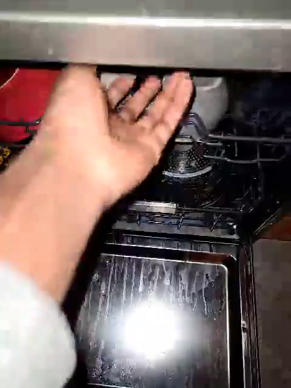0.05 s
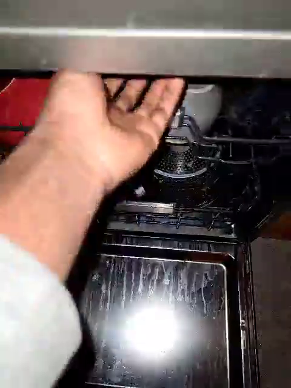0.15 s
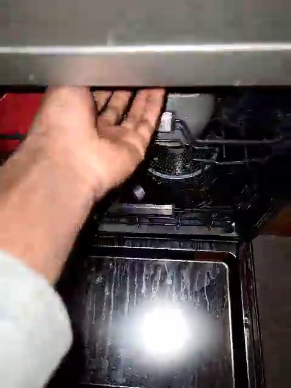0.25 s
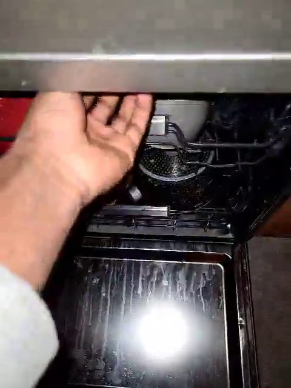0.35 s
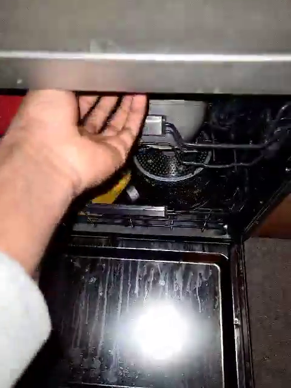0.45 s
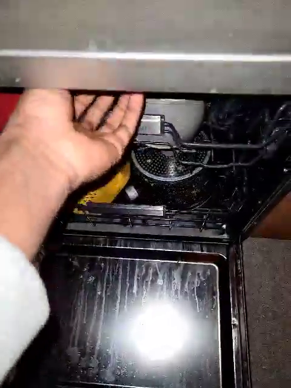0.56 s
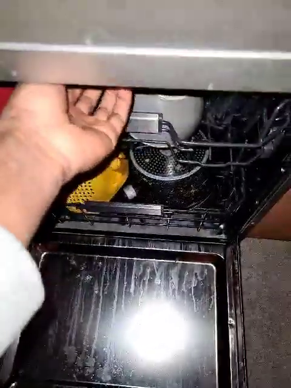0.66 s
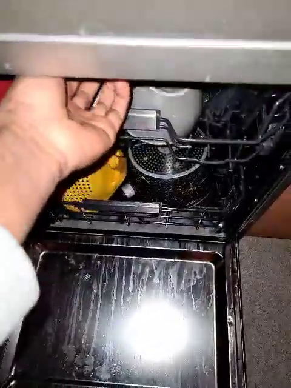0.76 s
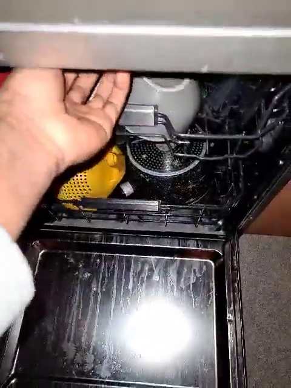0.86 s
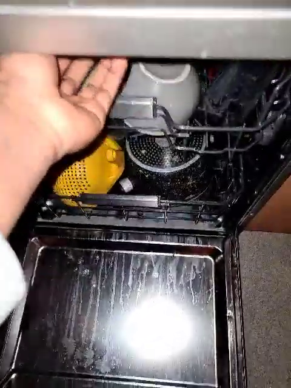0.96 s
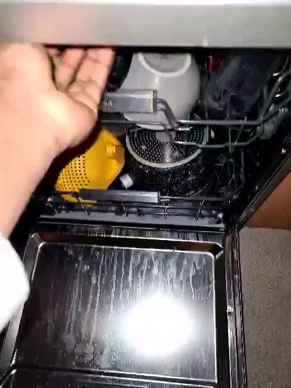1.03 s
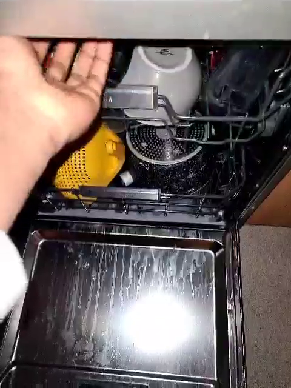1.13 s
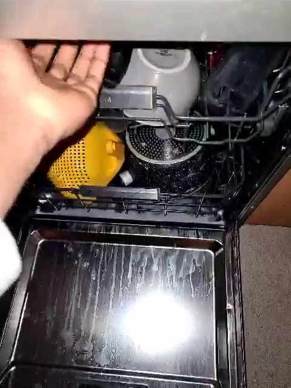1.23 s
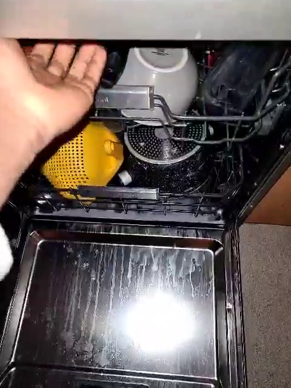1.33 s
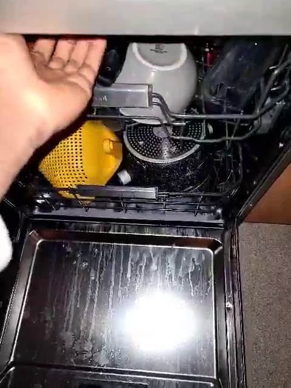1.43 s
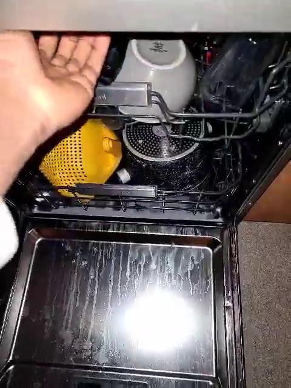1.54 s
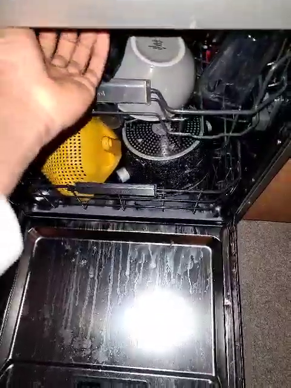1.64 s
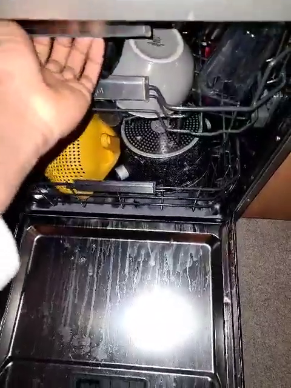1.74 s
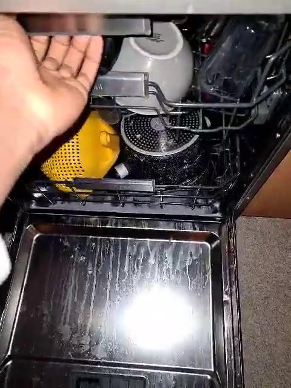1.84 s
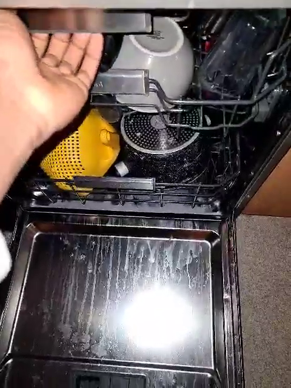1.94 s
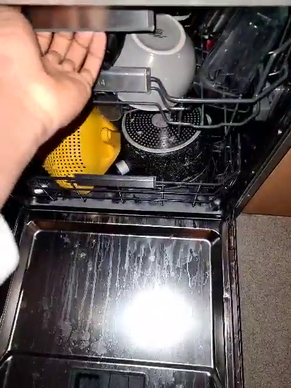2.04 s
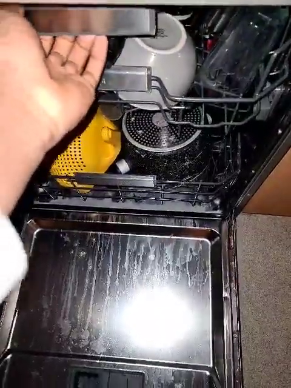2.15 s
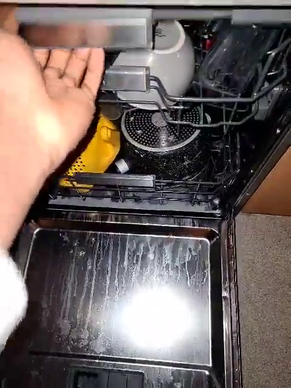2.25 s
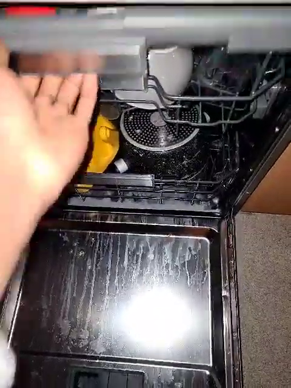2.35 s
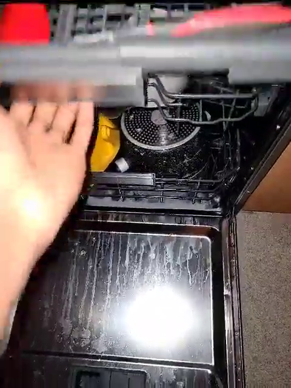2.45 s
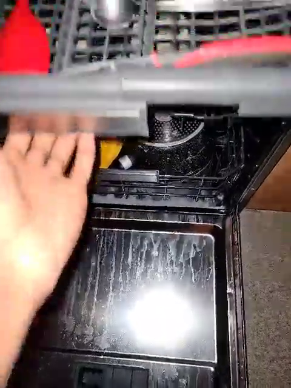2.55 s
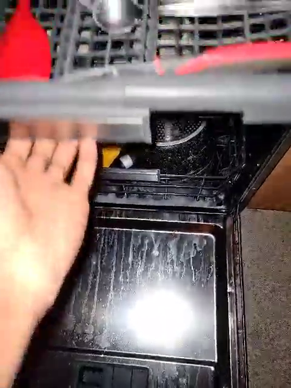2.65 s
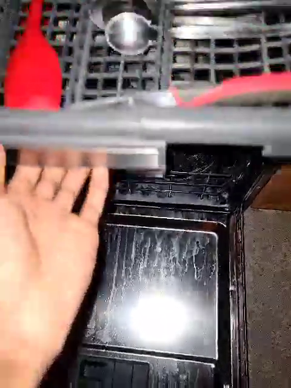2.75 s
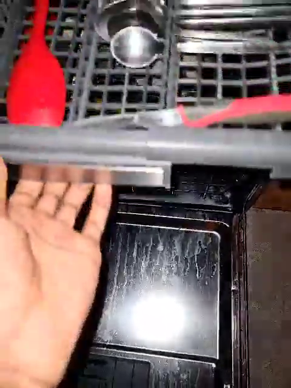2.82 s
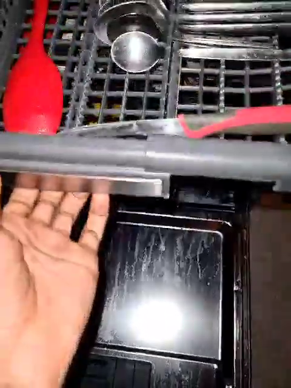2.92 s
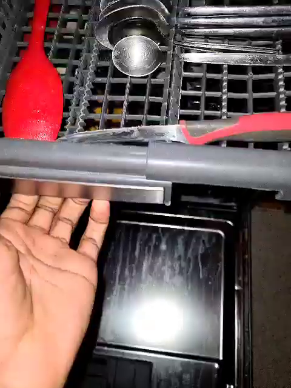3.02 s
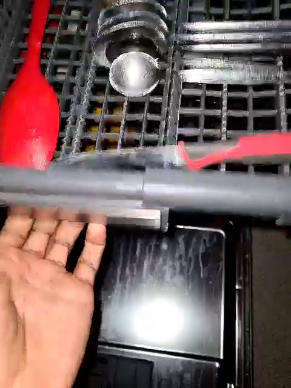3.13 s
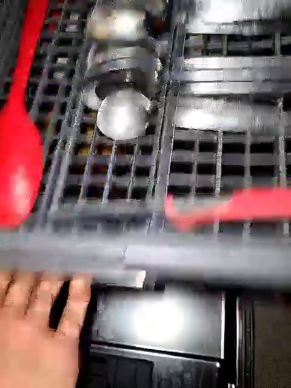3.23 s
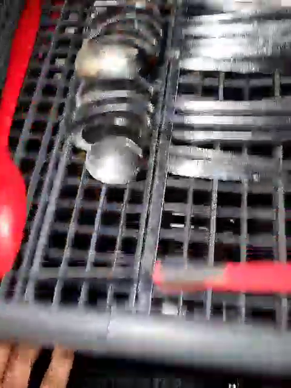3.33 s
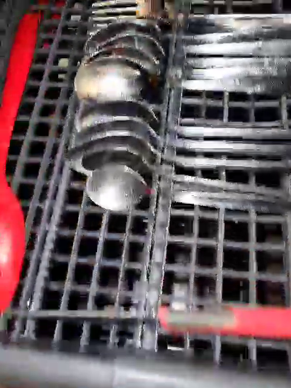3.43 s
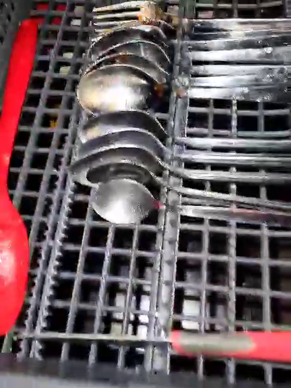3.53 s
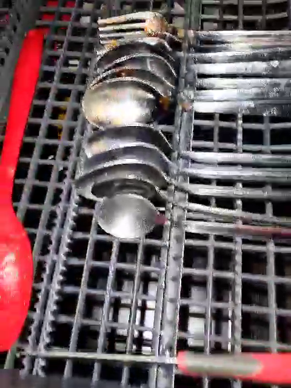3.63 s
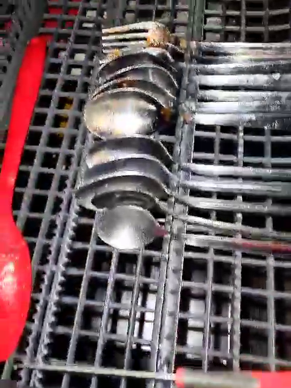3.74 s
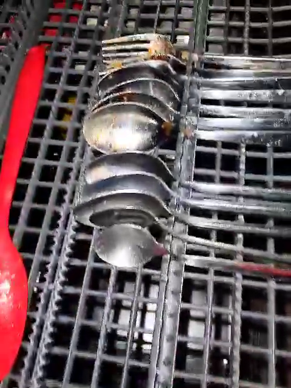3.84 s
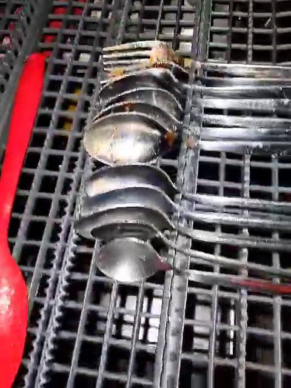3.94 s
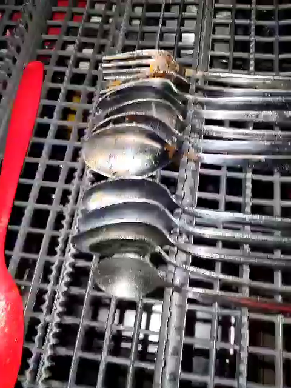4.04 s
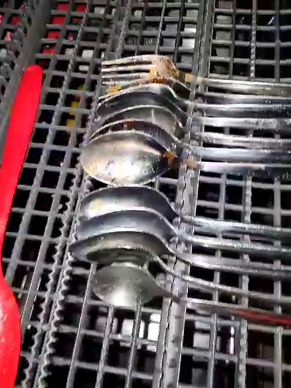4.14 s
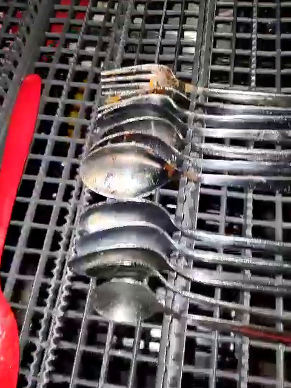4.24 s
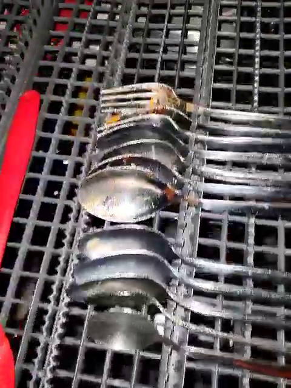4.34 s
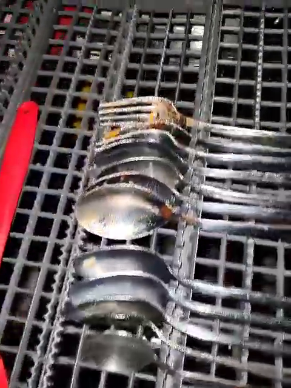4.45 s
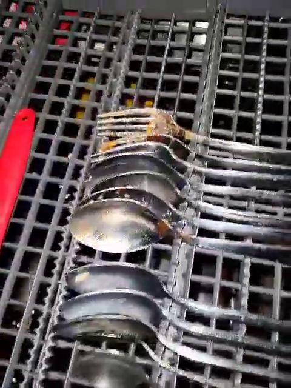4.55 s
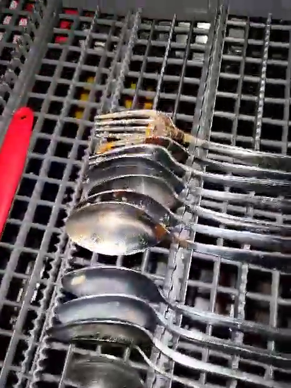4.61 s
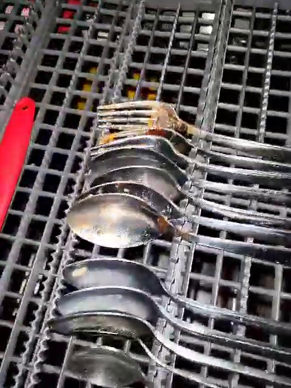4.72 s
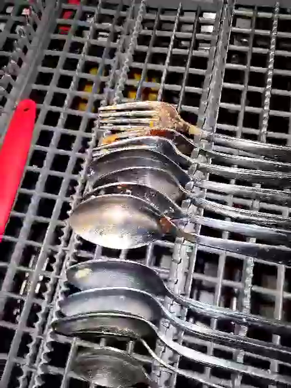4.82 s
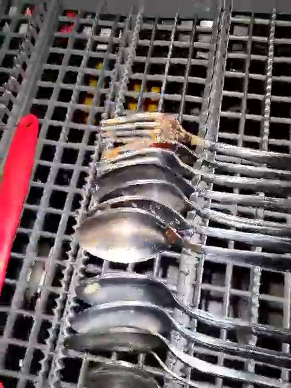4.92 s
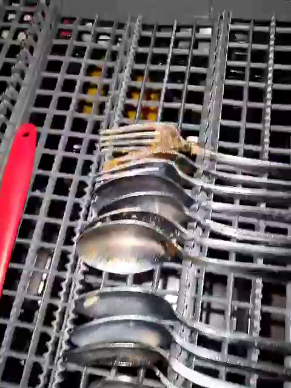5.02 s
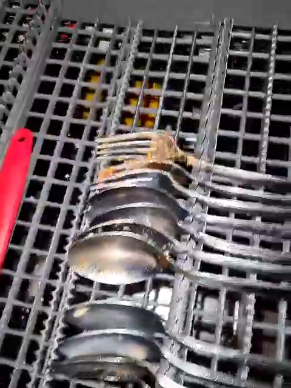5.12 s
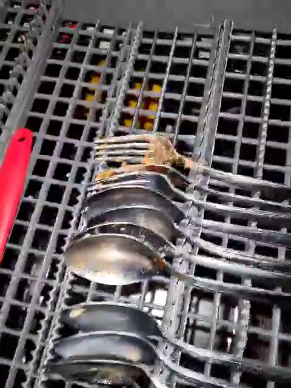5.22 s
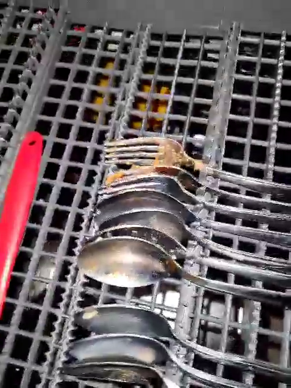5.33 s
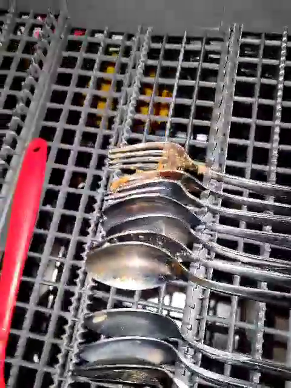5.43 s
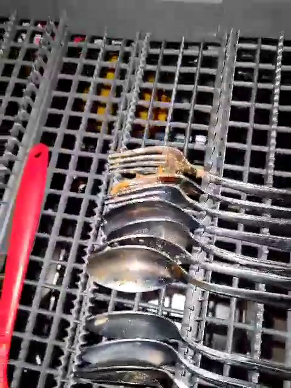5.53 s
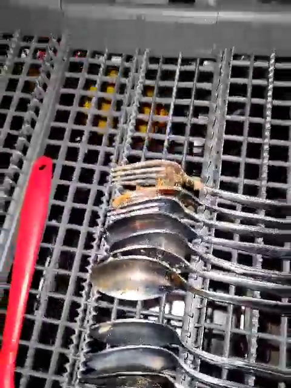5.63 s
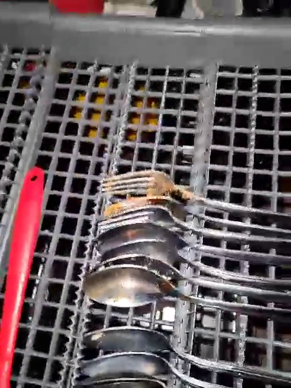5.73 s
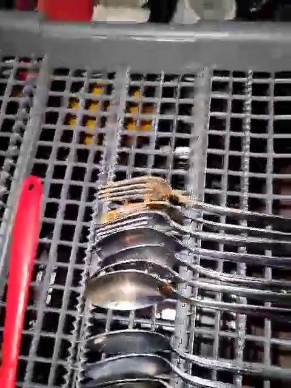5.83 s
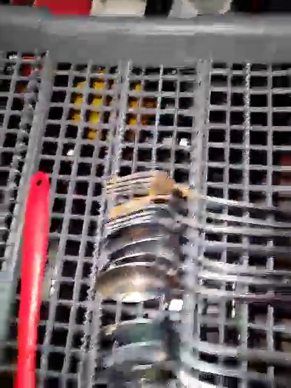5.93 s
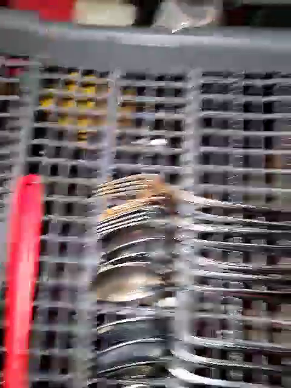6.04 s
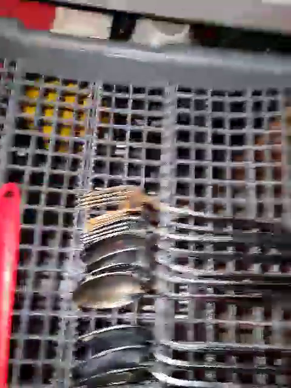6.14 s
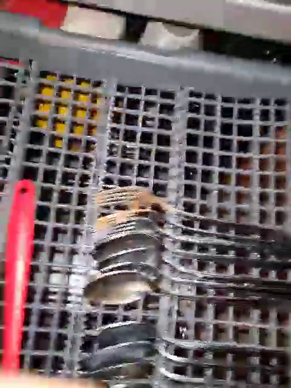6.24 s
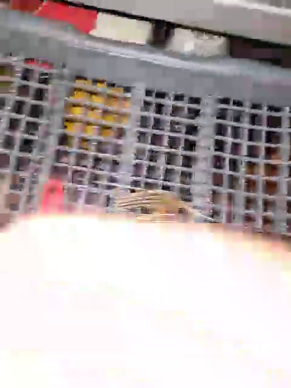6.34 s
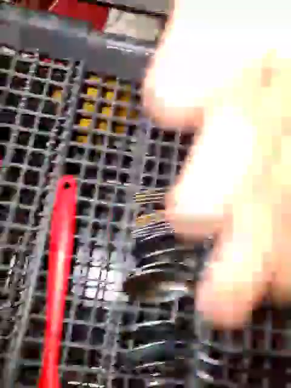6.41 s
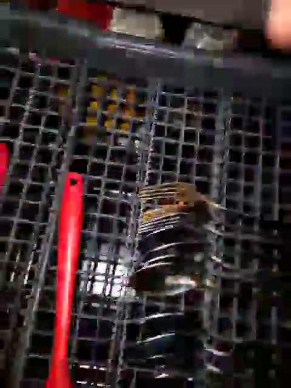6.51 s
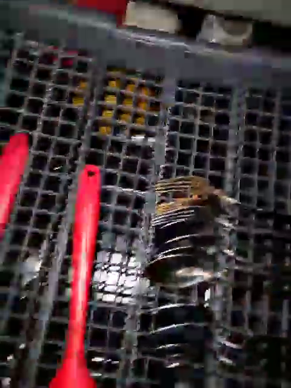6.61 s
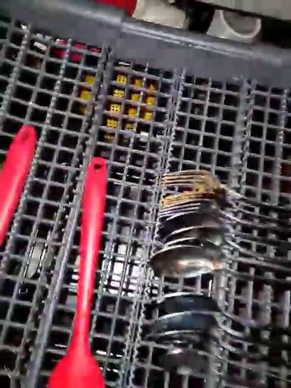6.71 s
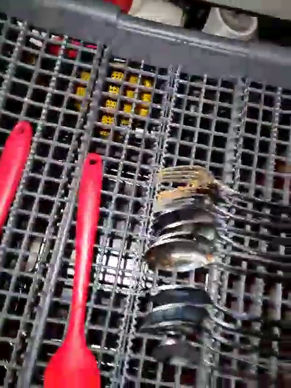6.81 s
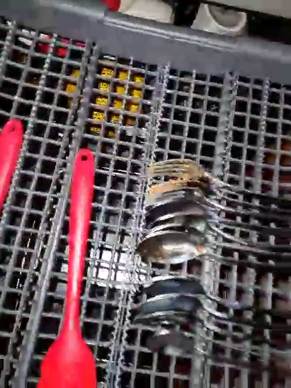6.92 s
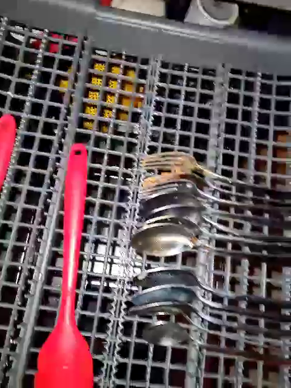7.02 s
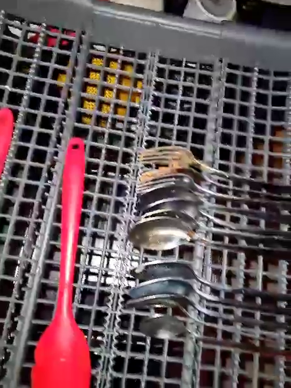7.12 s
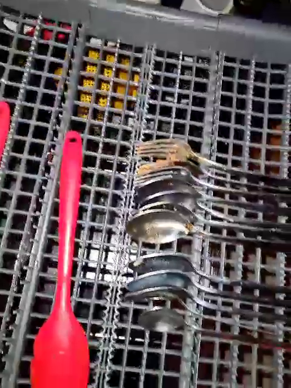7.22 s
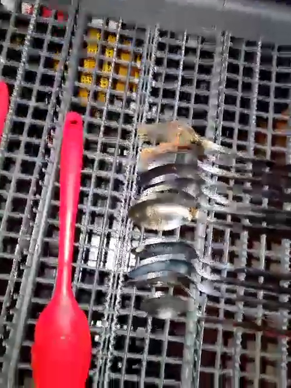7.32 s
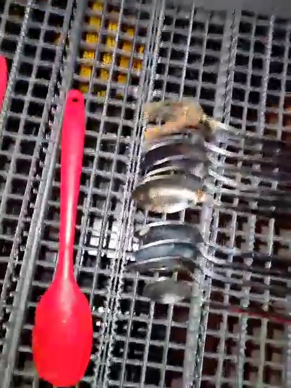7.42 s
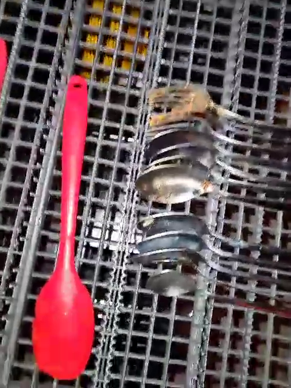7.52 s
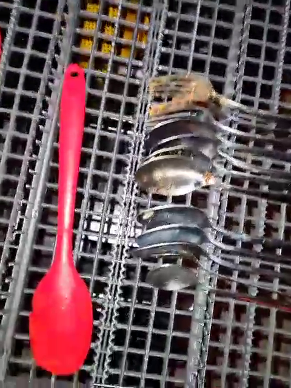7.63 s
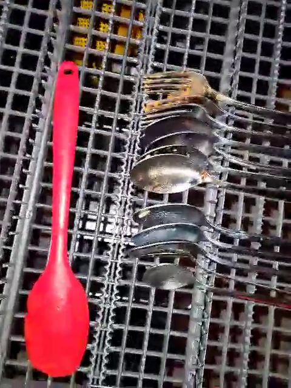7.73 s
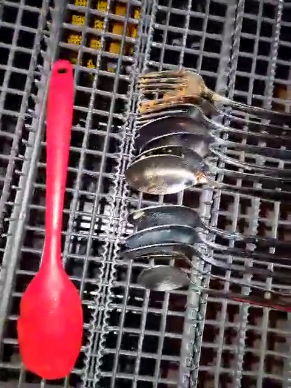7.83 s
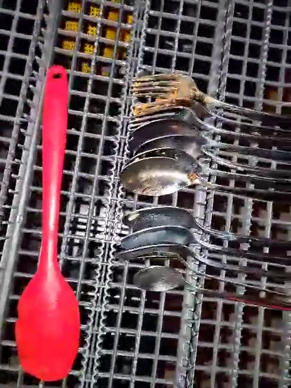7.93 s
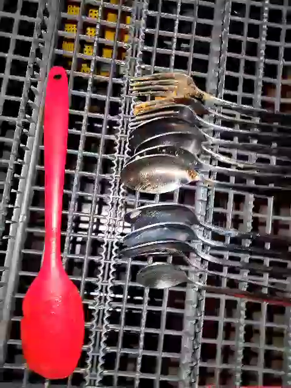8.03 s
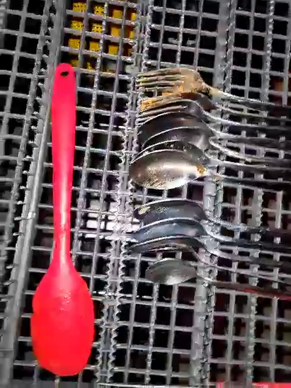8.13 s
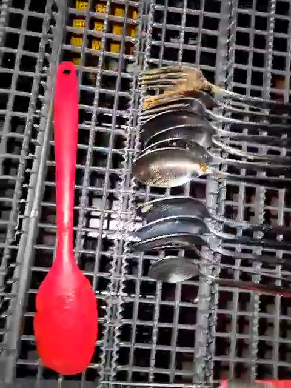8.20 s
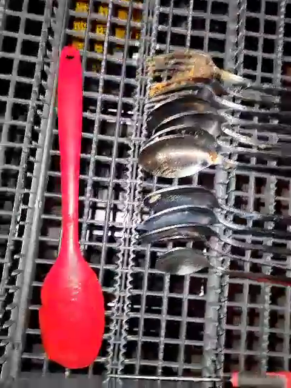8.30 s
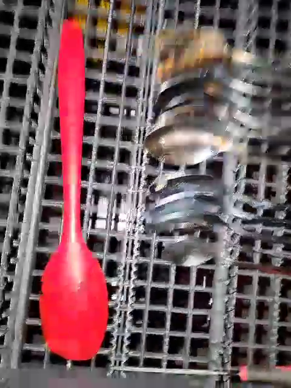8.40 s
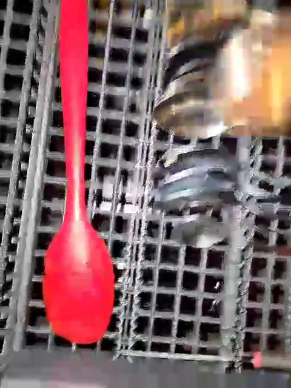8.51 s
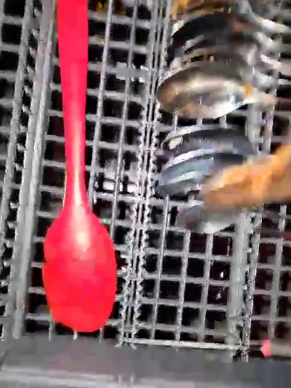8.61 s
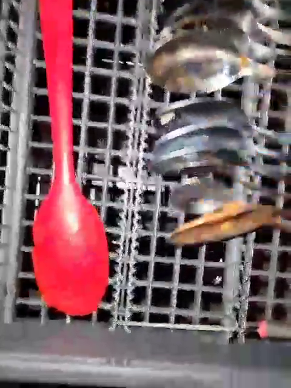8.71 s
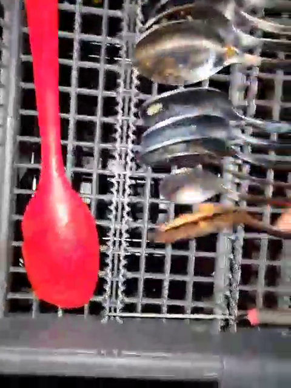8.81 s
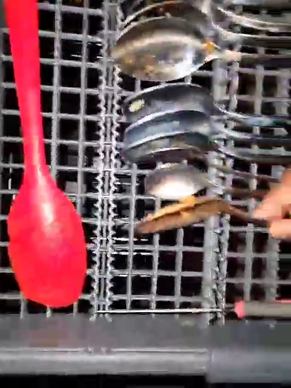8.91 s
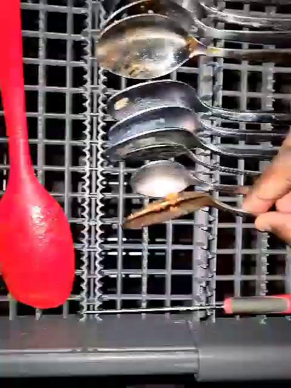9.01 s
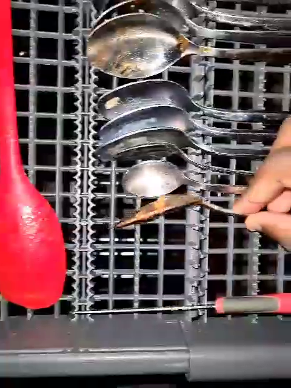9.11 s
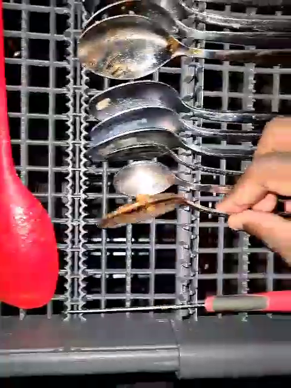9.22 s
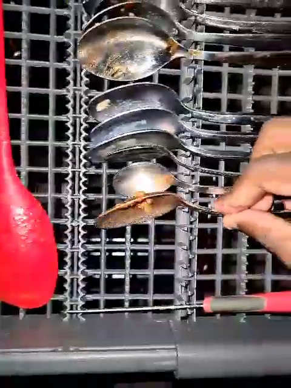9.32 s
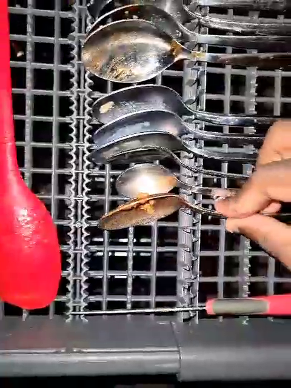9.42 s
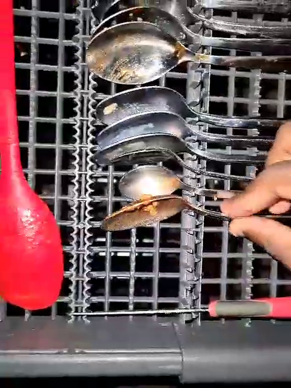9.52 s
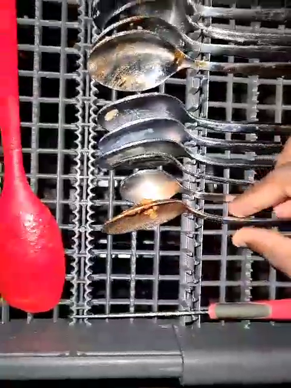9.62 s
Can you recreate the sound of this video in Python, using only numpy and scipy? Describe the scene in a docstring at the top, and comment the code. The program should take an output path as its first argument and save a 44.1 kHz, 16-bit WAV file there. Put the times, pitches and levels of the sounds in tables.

```python
"""A quiet kitchen, at an open dishwasher. A hand grips the cutlery tray and pulls it out: the rollers
grind, squeak and bump along the rails until the tray crashes into its stop and the cutlery jingles.
The tray is nudged once more, then fingers pick among the spoons with light clicks. Rolling and knocks
are showers of tiny contacts that set the steel tub ringing; spoons and a rack wire ring in their modes."""
import sys
import numpy as np
from scipy import signal
from scipy.fft import rfft, irfft
from scipy.io import wavfile

SR = 44100
rng = np.random.default_rng(int(sys.argv[2]) if len(sys.argv) > 2 else 0)


def to_wav(sig):
    """Store sig (one row per channel, or 1-D mono) as 16-bit WAV at the path in sys.argv[1].

    Samples outside -1..1 are clipped; the rate is SR.
    """
    pcm = np.clip(np.atleast_2d(sig), -1, 1) * 32767
    pcm = np.round(pcm).astype(np.int16)
    wavfile.write(sys.argv[1], SR, pcm.T)  # frames by channels


N = 426006
TIME = np.arange(N) / SR


def from_db(db):
    """Decibels to gain."""
    return 10 ** (np.asarray(db) / 20)


def rms(x):
    """Root mean square."""
    return np.sqrt(np.mean(x ** 2) + 1e-20)


def band(x, low_hz, high_hz):
    """Band-pass a sound."""
    return signal.sosfilt(signal.butter(3, [low_hz, high_hz], "band", fs=SR, output="sos"), x + 1e-18)


def resonate(x, hz, width_hz, boost_db):
    """Bell EQ: lift one resonance, or scoop it with a negative boost."""
    peak = signal.lfilter(*signal.iirpeak(hz, hz / width_hz, fs=SR), x + 1e-18)
    return x + (from_db(boost_db) - 1) * peak


def coloured(x, curve):
    """Shape a steady signal with an EQ curve drawn over log frequency; rms 1."""
    hz, db = np.transpose(curve)
    bin_hz = np.fft.rfftfreq(N, 1 / SR)
    gain = from_db(np.interp(np.log(bin_hz + 1e-3), np.log(hz), db))
    shaped = irfft(rfft(x) * gain, N)
    return shaped / rms(shaped)


def add(track, start_s, sound):
    """Mix a sound into the track."""
    start = max(round(start_s * SR), 0)
    track[start:start + len(sound)] += sound[:N - start]


def grains(per_s, spread_db, size):
    """Random contacts of uneven strength and either sign."""
    hits = (rng.random(size) < per_s / SR) * rng.choice([-1, 1], size)
    return hits * from_db(spread_db * np.minimum(rng.exponential(1, size), 4))


def struck(modes, t):
    """Decaying modes, each struck with a slightly different strength."""
    hz, db, t60 = np.transpose(modes)[:, :, None]
    strike_db = db + 2 * rng.standard_normal(hz.shape)
    return np.sum(from_db(strike_db - 60 * t / t60) * np.sin(2 * np.pi * hz * t), axis=0)


# The bass, body, clack and treble bands. Each row: low edge in Hz, high edge in Hz.
TONE_BANDS = [(130, 400), (400, 1500), (1500, 5000), (5000, 13000)]
# The kitchen's tail. Each entry: T60 in seconds for one of those bands.
KITCHEN_T60 = [0.27, 0.41, 0.36, 0.3]

def space(early_db, early_t60, late_db):
    """Echo pattern: the direct sound, quick reflections between steel walls, then the kitchen's tail."""
    t = TIME[:SR * 2 // 3]
    late = sum(band(rng.standard_normal(len(t)), low, high) * from_db(-60 * t / t60)
               for (low, high), t60 in zip(TONE_BANDS, KITCHEN_T60))
    late *= 1 - np.exp(-t / 0.0043)
    early = rng.standard_normal(len(t)) * (rng.random(len(t)) < .06) * from_db(-60 * t / early_t60)
    echo = from_db(early_db) * early / np.linalg.norm(early)
    echo += from_db(late_db) * late / np.linalg.norm(late)
    echo[0] += 1
    return echo


# Resonances of tub and tray, plus an EQ dip near 390 Hz.
# Each row: centre in Hz, width in Hz, boost in dB.
TUB_EQ = [(205, 14, 4.5), (319, 5.6, 5), (389, 140, -4), (574.6, 12, 5), (846, 17, 6), (917.6, 10, 2.5),
          (1210, 63, 0.5), (1450, 27, 5), (1740, 110, 4), (1990, 97, 3)]

def tub(x):
    """The tub and tray lift their own pitches out of whatever shakes them; an EQ dips the low mids."""
    for hz, width_hz, boost_db in TUB_EQ:
        x = resonate(x, hz, width_hz, boost_db)
    return x


# EQ of the room tone. Each row: frequency in Hz, relative gain in dB.
ROOM_TONE_EQ = [(15, -31), (25, -6), (60, 6.5), (129, 2), (177, -8.5), (271, -4), (569, -28), (1600, -23),
                (4730, -30.5), (11000, -33.5), (12900, -37), (14000, -29.5)]

def room_tone(level_db=-66.5):
    """The still kitchen: a faint bed of bass-heavy noise."""
    return from_db(level_db) * coloured(rng.standard_normal(N), ROOM_TONE_EQ)


# The long pull: the tray gets going, rolls evenly, hesitates, then races into its stop.
# Each row: time in seconds, speed in dB relative to even rolling.
PULL_SPEED = [(2.1, -27.5), (2.2, -4.5), (2.235, -6), (2.32, 3), (2.43, -1.5), (2.52, 2), (2.7, -2),
              (2.88, 1), (2.97, 0), (3.1, -6), (3.18, 2.5), (3.25, 13.5), (3.311, 12.5)]
# Short shifts of the tray under the hand or after a jolt.
# Each row: start in seconds, length in seconds, level in dB, load on the rails in dB.
TRAY_SHIFTS = [(0, 0.034, -64.5, -8), (0.119, 0.16, -66, 4), (0.313, 0.081, -76, 17.5),
               (0.454, 0.12, -61, -4), (0.657, 0.24, -66.5, 8), (0.99, 0.22, -63.5, -0.5),
               (1.23, 0.39, -79.5, 13), (1.509, 0.081, -57, 1), (1.595, 0.17, -61, 8),
               (3.268, 0.023, -37, 4.5), (3.51, 0.097, -59, 7.5), (3.69, 0.12, -70.5, 5),
               (3.852, 0.54, -76, 7), (4.297, 0.33, -67, 2.5), (4.802, .12, -65.5, -5),
               (4.982, 0.041, -65, 5.5), (5.131, 0.17, -63, 3.5), (5.419, 0.21, -73, 3.5),
               (5.726, .1, -64, -7), (5.897, 0.25, -69, -13.5), (6.146, 0.16, -68, -5),
               (6.422, .06, -69, -7), (6.55, .06, -64, -6), (6.74, .37, -68.5, -11.5),
               (8.166, 0.093, -68.5, -16)]

def motion(rolling_db, per_speed, shift_db, per_load, attack_s=0.032, release_db_per_s=99.5):
    """Envelope of one tray layer: it rides the pull's speed; each shift swells, holds and dies away."""
    times, speed_db = np.transpose(PULL_SPEED)
    pulling = (TIME > times[0]) * (TIME < times[-1])
    power = from_db(rolling_db + per_speed * np.interp(TIME, times, speed_db)) ** 2 * pulling
    t = TIME[:2 * SR]
    swell = np.minimum(t / attack_s, 1)
    for start_s, length_s, db, load_db in TRAY_SHIFTS:
        release_db = release_db_per_s * np.maximum(t - length_s, 0)
        shift = swell * from_db(db + shift_db + per_load * load_db - release_db)
        add(power, start_s, shift ** 2)
    return np.sqrt(power)


# EQs of the moving tray's three layers. Each row: frequency in Hz, relative gain in dB.
RUMBLE_EQ = [(22, -33), (45, -10.5), (70, 2), (120, 0), (200, -3.5), (320, -4), (400, -12.5), (700, -48.5)]
GRIND_EQ = [(250, -22), (420, 5.5), (800, 5.5), (1400, 2), (2100, 0.5), (2800, -12), (4500, -32)]
HISS_EQ = [(1600, -27.5), (2700, 2.5), (4300, 0.5), (5400, -1.5), (6800, -12.5), (10000, -12),
           (14000, -16.5)]
# The mix of rumble, grind and hiss. Each row: level at even rolling in dB, dB gained per dB of speed,
# trim during a shift in dB, dB gained per dB of load.
TRAY_LAYERS = [(-42.5, .78, 5, 1), (-46.5, 1, 1.5, 0.58), (-55.5, 1.15, -0.5, 0)]

def sliding():
    """Rollers and runners cross countless small bumps; the echoes change as the tray travels."""
    shaking, hop = np.zeros(N), SR // 8
    crossfade = np.sqrt(np.hanning(2 * hop))
    for start in range(-hop, N, hop):
        contacts = grains(per_s=1600, spread_db=3.6, size=2 * hop) * crossfade
        echoes = space(early_db=2.0, early_t60=.05, late_db=-3.5)
        add(shaking, start / SR, signal.fftconvolve(contacts, echoes))
    shaking = tub(shaking)
    return sum(motion(*layer) * coloured(shaking, curve)
               for layer, curve in zip(TRAY_LAYERS, (RUMBLE_EQ, GRIND_EQ, HISS_EQ)))


def rattle(re_hiss_db=-8):
    """Loose cutlery ticks at random against the plastic grid, riding the envelope of the tray's hiss."""
    contacts = grains(per_s=45, spread_db=3, size=N)
    touches = signal.fftconvolve(contacts, space(early_db=0.5, early_t60=.04, late_db=-5))[:N]
    touches = resonate(touches, hz=3500, width_hz=1500, boost_db=6.5)
    touches = band(touches, low_hz=1100, high_hz=9000)
    return from_db(re_hiss_db) * motion(*TRAY_LAYERS[-1]) * touches / rms(touches)


# The tray clacks on its rails and cutlery shifts in it. Each row: start in seconds, chatter time in
# seconds, level in dB, heft in dB (how much the frame shakes), edge in dB (how hard the parts meet),
# pitch of the struck part in Hz.
TRAY_KNOCKS = [(.095, 0.013, -62.5, 0, -0.5, 1670), (.196, 0.0028, -49, -2, -14, 2600),
               (.393, 0.0027, -58.5, -3, -15, 2840), (.424, 0.0096, -56, -10, -3.5, 3020),
               (.76, 0.0065, -53, 5.5, -7.5, 1510), (.849, .012, -53.5, 3, -3, 1250),
               (.992, .003, -55, -5, -14, 3550), (1.047, 0.0086, -59, -1.5, -20, 3800),
               (1.081, .0045, -49, -8.5, -5.5, 4050), (1.309, 0.0041, -60.5, 2, -16, 1900),
               (1.593, .012, -41, -10.5, -22, 2680), (1.657, 0.014, -42.5, -6.5, -16, 4200),
               (1.928, 0.013, -59.5, -7, -8.5, 3370), (2.041, 0.028, -60, -6, -11, 854),
               (2.251, 0.0042, -45, -11, -10.5, 1800), (2.272, 0.018, -38, -9.5, -14.5, 4050),
               (2.547, 0.0022, -49, 14, -23, 1180), (2.746, 0.0052, -45.5, 1, -18, 1780),
               (2.818, 0.0038, -47.5, -7, -11, 4150), (2.991, 0.0029, -34.5, 3.5, -13, 695),
               (3.118, .004, -50.5, 6.5, -18, 1670), (3.297, 0.017, -28, -13, -4, 820),
               (3.313, 0.007, -20.5, -9, -13, 3400), (3.524, 0.0078, -47, 9.5, -18, 755),
               (3.612, 0.0018, -49.5, 1.5, -16, 1750), (4.69, .001, -57, -23, -2, 5340),
               (4.972, 0.017, -57.5, -1, -16, 870), (5.217, .0055, -37.5, 0, -10.5, 860),
               (5.246, 0.0028, -45.5, 3, -6.5, 580), (5.376, 0.018, -55.5, -27.5, -3, 830),
               (5.415, 0.013, -53.5, 2, -12, 845), (5.5, 0.029, -57.5, -17, -1, 3100),
               (5.708, .019, -66, 5, 4.5, 1500), (6.145, 0.052, -56, -13.5, -8.5, 2880),
               (6.304, 0.016, -55.5, -10, -8.5, 1020), (6.63, 0.0061, -51, -21, -1.5, 5040),
               (6.699, .015, -57.5, -7, -8.5, 3080), (6.867, 0.017, -46, -11.5, -14.5, 1560),
               (6.962, 0.0041, -56, -15, -3.5, 3300), (7.027, 0.0039, -55, -23, -2.5, 2910),
               (7.075, 0.0097, -59.5, -16.5, -26, 2760), (7.301, 0.012, -52, -17.5, -5.5, 2180),
               (7.755, 0.032, -65.5, -3.5, -10, 698), (7.939, 0.03, -54.5, -8.5, -15.5, 1110),
               (8.315, 0.0089, -50, -11, -3, 4980), (8.621, 0.0077, -65.5, -17.5, 0.5, 3280)]

def knocks(first_touch=0.87, part_q=8):
    """Each knock is a first touch and a dying chatter of loose parts, which set the tub ringing."""
    out, t = np.zeros(N), TIME[:SR * 2 // 3]
    attack = round(.03 * SR)
    for start_s, chatter_s, level_db, heft_db, edge_db, part_hz in TRAY_KNOCKS:
        contacts = grains(per_s=2200, spread_db=4.5, size=len(t))
        contacts *= t / chatter_s * np.exp(-2 * t / chatter_s)
        contacts /= np.linalg.norm(contacts) + 1e-9
        contacts[0] += first_touch * np.exp(-chatter_s / 0.0063)   # a long chatter begins softly
        # every knock comes from another spot, with echoes of its own
        echoes = space(early_db=2.5, early_t60=.06, late_db=-0.5)
        knock = tub(signal.fftconvolve(contacts, echoes)[:len(t)])
        knock = resonate(knock, part_hz, width_hz=part_hz / part_q, boost_db=7.5)
        knock = resonate(knock, hz=11100, width_hz=3900, boost_db=-3)
        # heft fills the bass and part of the body; a hard edge adds treble
        body_db = -0.5 + .55 * heft_db
        for (low, high), band_db in zip(TONE_BANDS, (heft_db, body_db, 0, edge_db)):
            layer = band(knock, low, high)
            add(out, start_s, from_db(level_db + band_db) * layer / rms(layer[:attack]))
    return out


# Short hoarse tones: plastic rubbing, and one dish ringing briefly at 566 Hz. Each row: midpoint in
# seconds, half length in seconds, level in dB, pitch in Hz, glide in octaves per half length.
RUBS_AND_DISH_RING = [(0.31, .018, -57, 1900, -0.02), (0.166, 0.024, -56, 1315, 0),
                      (0.903, 0.034, -53.5, 1440, .17), (1.618, 0.057, -47, 566, 0.02),
                      (2.894, 0.035, -42, 1293, -0.093), (3.232, 0.02, -37, 1550, 0.21),
                      (3.269, .025, -37, 3980, 0.1), (4.847, 0.065, -64.5, 1337, -0.101),
                      (6.31, .025, -54.5, 1123, -.2), (6.001, 0.081, -66.5, 1453, -0.13),
                      (6.903, .025, -49, 1595, 0)]

def rubs_and_dish_ring(roughness_hz=230):
    """Narrow bands of noise: the hoarse whistle of plastic sticking and slipping, and a dish's ring."""
    out = np.zeros(N)
    smoothing = signal.butter(2, roughness_hz, fs=SR, output="sos")
    for middle_s, half_s, db, hz, glide in RUBS_AND_DISH_RING:
        u = np.arange(-3 * half_s, 3 * half_s, 1 / SR) / half_s   # half lengths from the midpoint
        flutter = signal.sosfilt(smoothing, rng.standard_normal((2, len(u))))
        phase = 2 * np.pi * np.cumsum(hz * 2 ** (glide * u)) / SR
        tone = flutter[0] * np.cos(phase) + flutter[1] * np.sin(phase)
        add(out, middle_s + u[0] * half_s, from_db(db) * np.exp(-u * u) * tone / rms(tone))
    return out


# Heavier bumps of the rollers and frame. Each row: start in seconds, level in dB, pitch in Hz.
ROLLER_BUMPS = [(0.706, -40, 87), (.799, -41.5, 90.5), (1.025, -41.5, 107), (1.477, -43, 73.4),
                (1.631, -36, 88), (1.745, -38, 79), (2.316, -30.5, 196), (2.344, -32, 310),
                (2.556, -28, 126), (2.762, -27, 120), (2.924, -27.5, 100), (2.989, -37, 114),
                (3.296, -19, 176.6), (3.321, -31.5, 72.5), (3.526, -32, 176), (3.59, -39, 85),
                (5.221, -39, 72), (6.071, -41, 70), (6.168, -47, 110), (6.231, -45.5, 63)]

def bumps(rise_s=.011, trim_db=-1):
    """The loaded tray bounces for a few cycles on its rails."""
    out, t = np.zeros(N), TIME[:SR // 4]
    envelope = t / rise_s * np.exp(1 - t / rise_s)
    for start_s, db, hz in ROLLER_BUMPS:
        add(out, start_s, from_db(db + trim_db) * envelope * np.sin(2 * np.pi * hz * t))
    return out


# The ring of spoons and forks. Each row: pitch in Hz, relative level in dB, T60 in seconds.
CUTLERY_MODES = [(2550, -3.5, 0.091), (2600, 1.5, 0.091), (2880, 0, 0.18), (3030, 0.5, 0.19),
                 (3190, 1.5, 0.3), (4090, 0.5, .18), (4220, -2.5, 0.15), (4570, -5, .26), (4870, -5, .28),
                 (5300, -5, .22)]
# Pieces of cutlery touching. Each row: start in seconds, level in dB, pitch of the piece in Hz.
CUTLERY_CLINKS = [(1.596, -37.5, 2560), (1.663, -49, 4200), (2.275, -45, 4160), (3.32, -32, 4240),
                  (3.373, -47, 3360), (4.69, -72, 5400), (8.319, -66.5, 5000), (8.378, -58.5, 2910)]

def clinks(reach_octaves=0.098):
    """A touch rings the modes near the pitch of that piece of cutlery."""
    out, t = np.zeros(N), TIME[:SR // 2]
    hz, mode_db, t60 = np.transpose(CUTLERY_MODES)
    for start_s, db, piece_hz in CUTLERY_CLINKS:
        falloff_db = 10 * np.log10(1 + (np.log2(hz / piece_hz) / reach_octaves) ** 4)
        modes = np.column_stack([hz, mode_db - falloff_db, t60])
        add(out, start_s, from_db(db) * struck(modes, t))
    return out


def buzzing(ring, depth_db=-8):
    """Loose metal chatters against the tray while it rings, which roughens its tones."""
    chatter = band(rng.standard_normal(N), low_hz=18, high_hz=110)
    return ring * (1 + from_db(depth_db) * chatter / rms(chatter))


# Squeaking rollers. Each row: midpoint in seconds, half length in seconds, level in dB, pitch in Hz.
ROLLER_SQUEAKS = [(1.854, 0.071, -54.5, 415), (2.152, 0.012, -34, 707), (2.2, 0.008, -49, 720),
                  (2.603, 0.0463, -57, 416)]

def squeaks(octave_db=-22, glide=0.014):
    """A roller sticks and slips: a nearly pure, slightly rising tone."""
    out = np.zeros(N)
    for middle_s, half_s, db, hz in ROLLER_SQUEAKS:
        u = np.arange(-3 * half_s, 3 * half_s, 1 / SR) / half_s   # half lengths from the midpoint
        phase = 2 * np.pi * np.cumsum(hz * (1 + glide * u)) / SR
        tone = np.sin(phase) + from_db(octave_db) * np.sin(2 * phase)
        add(out, middle_s + u[0] * half_s, from_db(db) * np.exp(-u * u) * tone)
    return out


# The brief ring of a tick. Each row: pitch in Hz, relative level in dB, T60 in seconds.
TICK_RING = [(1720, 6.5, 0.028), (1910, 9.5, 0.046), (2940, 0.5, 0.027), (4670, -11, 0.019)]
# Small dry ticks close by. Each row: start in seconds, peak in dB, swell in seconds, tray thud in dB.
CLOSE_TICKS = [(6.069, -44, 0.00023, -84), (6.0765, -33.5, 0.00032, -80), (8.957, -47, 0.0021, -54),
               (9.028, -45, 0.0022, -54), (9.077, -53, 0.0029, -60.5), (9.168, -49.5, 0.0048, -71.5),
               (9.1872, -27.5, 0.0011, -50.5), (9.222, -41.5, 0.0014, -57), (9.375, -58, 0.0011, -69),
               (9.468, -62.5, .001, -79.5)]

def ticks(thud_t60=0.32, crack_db=-10):
    """A contact swells and lets go within milliseconds: a pitched tick, a small crack, a tray thud."""
    out, t = np.zeros(N), TIME[:SR // 3]
    for start_s, db, swell_s, thud_db in CLOSE_TICKS:
        crack = band(rng.standard_normal(len(t)), low_hz=500, high_hz=5860)
        tick = struck(TICK_RING, t) + from_db(crack_db) * crack / rms(crack)
        tick *= t / swell_s * np.exp(-t / swell_s)
        add(out, start_s, from_db(db) * tick / np.abs(tick).max())
        shake = tub(rng.standard_normal(len(t)))
        thud = band(shake, low_hz=187, high_hz=380)
        thud += from_db(-23) * band(shake, low_hz=500, high_hz=4710)
        add(out, start_s, from_db(thud_db - 60 * t / thud_t60) * thud / rms(thud))
    return out


# The ring of a rack wire. Each row: pitch in Hz, relative level in dB, T60 in seconds.
WIRE_MODES = [(677, 3, 0.21), (1260, -6, 0.25), (1850, -4.5, .27), (2480, -9, 0.28), (3203, -9, 0.33),
              (4204, -8.5, 0.41), (5000, -11.5, 0.36), (8306, -11, .26)]
# The pluck of that wire. Each row: start in seconds, level in dB.
WIRE_TWANGS = [(7.755, -61)]

def twang():
    """A plucked wire of the rack rings out in its inharmonic modes."""
    out, t = np.zeros(N), TIME[:SR // 2]
    for start_s, db in WIRE_TWANGS:
        add(out, start_s, from_db(db) * struck(WIRE_MODES, t))
    return out


def scene():
    """Mono mix: small close sounds with little echo, the room tone and the tray."""
    close = ticks() + rubs_and_dish_ring() + buzzing(clinks() + twang())
    close = signal.fftconvolve(close, space(early_db=-14, early_t60=0.081, late_db=-11.5))[:N]
    bed = room_tone()
    tray = knocks() + sliding() + rattle() + bumps() + squeaks()
    return (close + bed + tray)[None]


def record(dry):
    """A steep low-pass takes off the very top."""
    cutoff_hz = 14100
    return signal.sosfilt(signal.ellip(12, .2, 80, cutoff_hz, fs=SR, output="sos"), dry)


dry = scene()
out = record(dry)
to_wav(out)
```